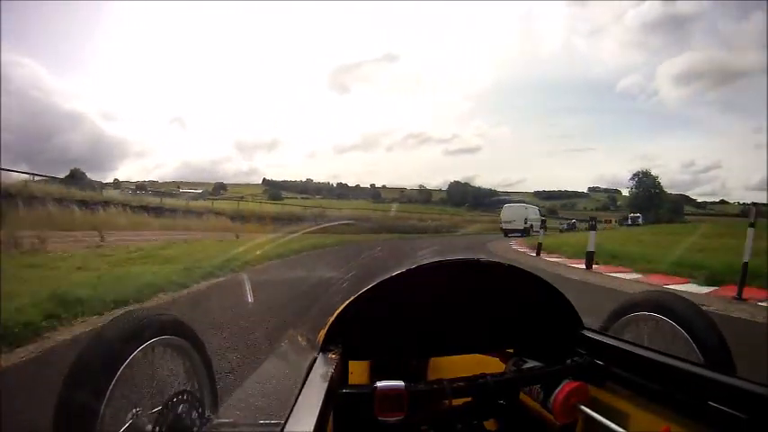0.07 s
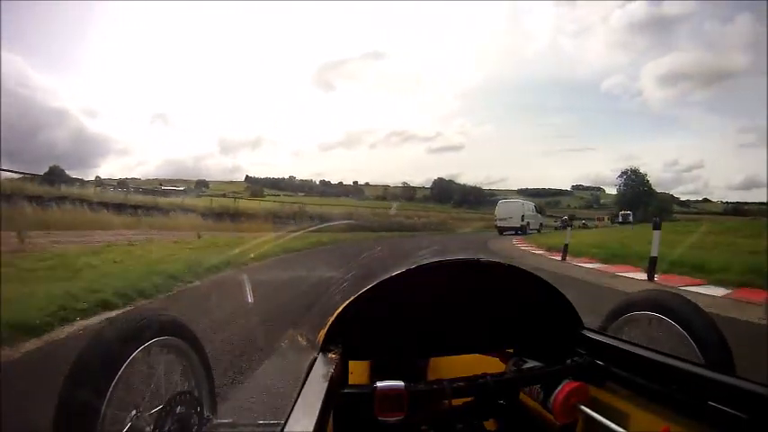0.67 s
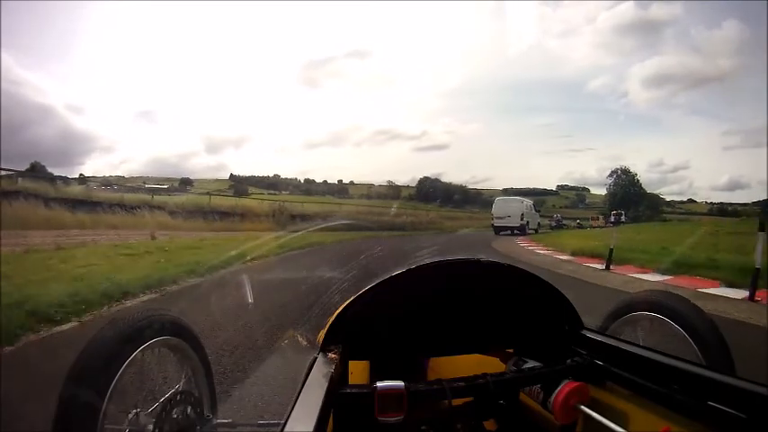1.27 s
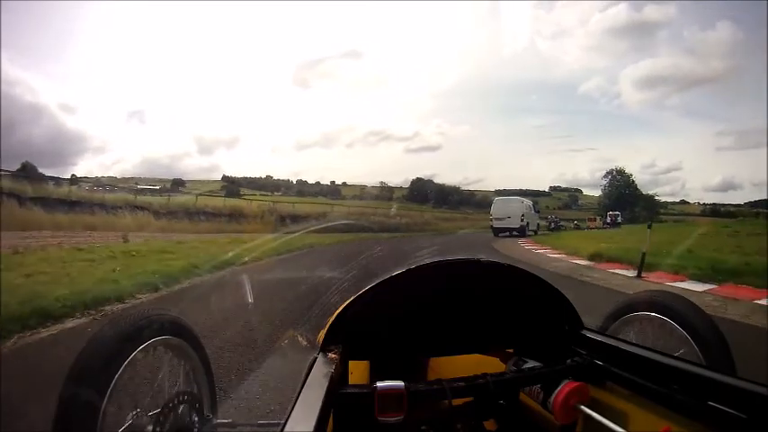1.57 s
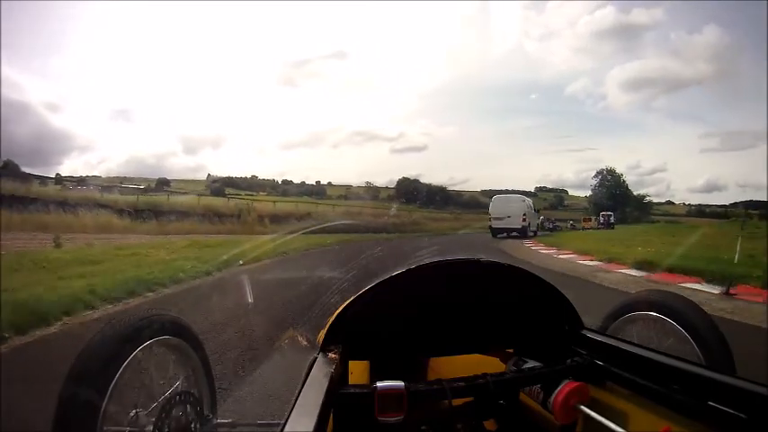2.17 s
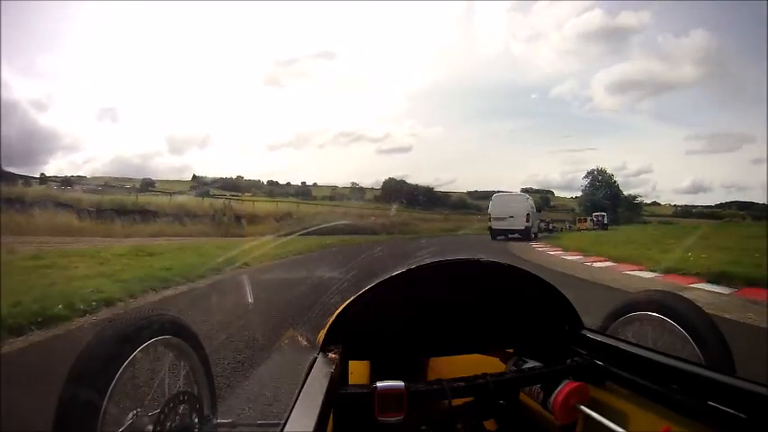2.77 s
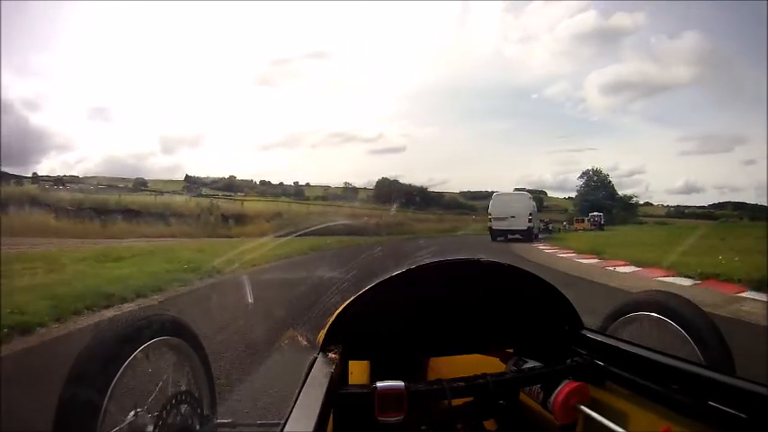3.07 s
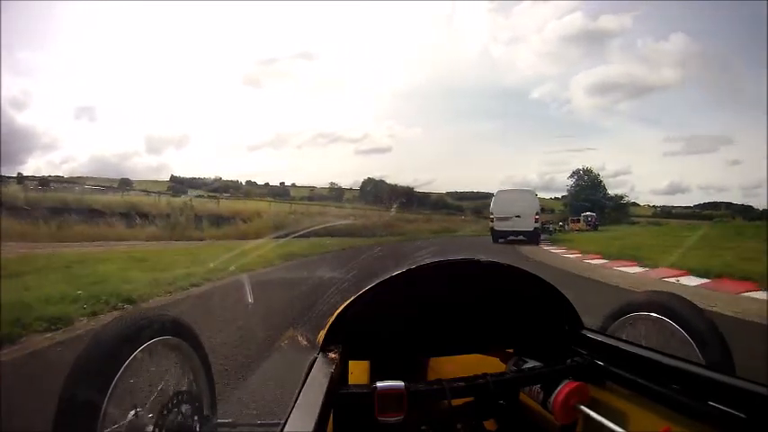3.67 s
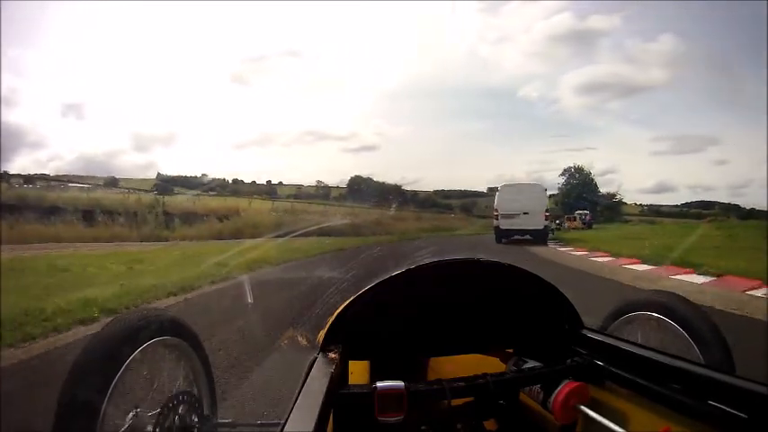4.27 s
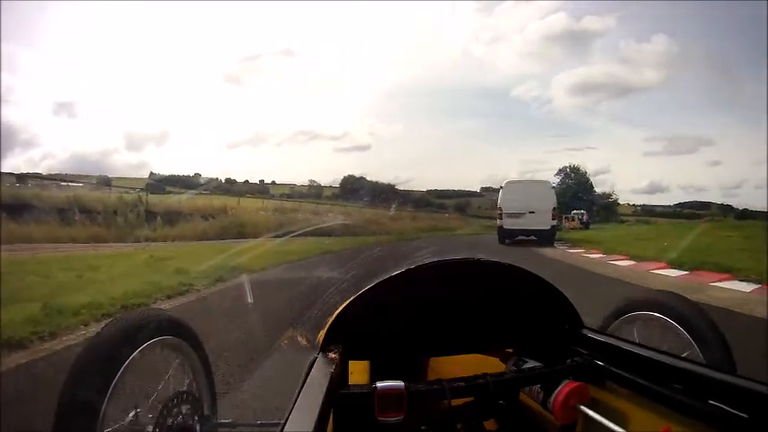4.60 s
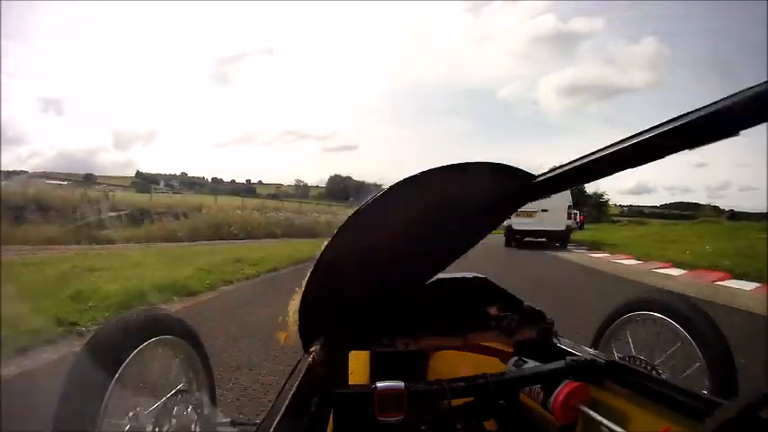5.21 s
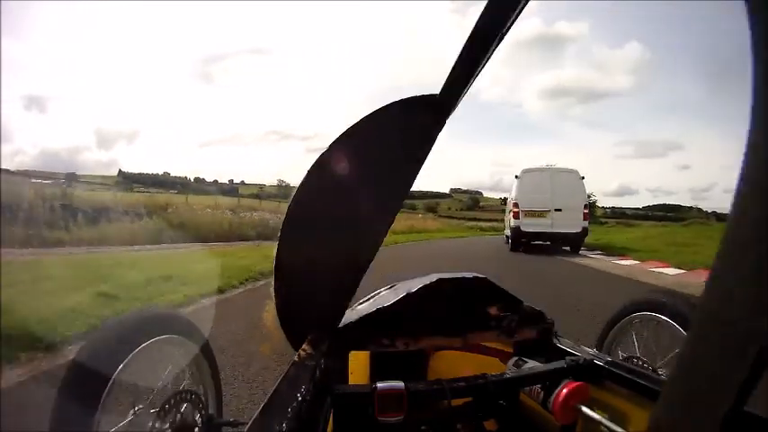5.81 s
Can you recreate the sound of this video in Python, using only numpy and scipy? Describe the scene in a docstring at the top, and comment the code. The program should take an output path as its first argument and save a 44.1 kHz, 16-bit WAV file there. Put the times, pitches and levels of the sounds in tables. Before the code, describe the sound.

A coasting cart drones and rumbles over bumps with light rattling, then its hood scrapes, snaps free and clacks open.

```python
"""A soapbox cart coasts along a paved track, heard from a closed camera case fixed to its body.
From the start the road shakes the frame into a low drone and the shell into a hollow rumble.
Bumps thump through this bed, the fittings chatter and the steering ticks. From 4.6 s the hood
scrapes over its catch; just before 5 s it snaps free with a buzz of the spring, then creaks
and clacks as it swings open."""
import sys
import numpy as np
from scipy.fft import rfft, irfft, next_fast_len
from scipy.io import wavfile
from scipy.ndimage import uniform_filter1d, map_coordinates

SR = 44100
rng = np.random.default_rng(int(sys.argv[2]) if len(sys.argv) > 2 else 0)


def bounce(signal):
    """Save signal as a 16-bit WAV file at the path given by the first command-line argument."""
    frames = np.transpose(np.atleast_2d(signal))
    limited = np.clip(frames, -1, 1)
    pcm = np.round(limited * 32767).astype(np.int16)
    wavfile.write(sys.argv[1], SR, pcm)


N = 257984

# drone of the flexing frame: t/s, level/dB
FRAME_DRONE = [(0.0, -24.5), (0.47, -19.5), (0.54, -35), (0.85, -22), (1.06, -29), (1.84, -21), (1.95, -28),
               (2.26, -22.5), (2.46, -33.5), (3.22, -22), (3.62, -33.5), (3.66, -21), (4.32, -33.5),
               (4.48, -20), (4.97, -31), (5.08, -19.5), (5.3, -43), (5.46, -20.5), (5.52, -48),
               (5.67, -21.5)]
# EQ of the cart heaving on its tyres: f/Hz, level/dB
HEAVE_EQ = [(8, -6.5), (20, 4.5), (29, -4), (45, 2.5), (56, 2), (90, -7), (500, -120)]
# roughness of the asphalt, as shell rumble: t/s, level/dB
ROAD_RUMBLE = [(0, -28.5), (0.75, -24), (0.95, -26.5), (1.6, -23.5), (2.65, -27), (3.3, -27), (3.82, -30),
               (4.0, -23), (4.4, -28), (5.85, -26)]
# bumps in the road: t/s, level/dB, length of the broken patch/s, rattle level/dB
ROAD_BUMPS = [(0.481, -14.5, 0.012, -45.5), (0.679, -22, 0.048, -64.5), (0.735, -22, 0.042, -61),
              (1.13, -15, 0.013, -48), (1.357, -14.5, 0.011, -49.5), (1.482, -15, 0.0098, -53),
              (1.535, -21, 0.024, -57.5), (1.788, -19.5, 0.011, -54), (2.114, -20, 0.015, -56),
              (2.516, -23, 0.015, -64.5), (2.795, -18, 0.03, -55), (2.862, -21.5, 0.019, -61.5),
              (2.917, -24.5, 0.012, -60.5), (3.022, -17.5, 0.045, -62.5), (3.378, -22, 0.017, -61.5),
              (3.466, -16, 0.022, -53), (3.556, -21.5, 0.0072, -56), (4.038, -19.5, 0.036, -58.5),
              (4.143, -20.5, 0.012, -52.5), (4.186, -22.5, 0.013, -55.5), (4.492, -19, 0.012, -46),
              (5.073, -18.5, 0.028, -52.5), (5.382, -26.5, 0.022, -63), (5.756, -17, 0.011, -59)]
# resonances of the body shell: f/Hz, width/Hz, level/dB
SHELL_MODES = [(107, 18, -12), (143, 26, -11.5), (183.7, 16, -8.5), (223.3, 30.5, -5), (259.4, 18, 1),
               (290.8, 16.67, 2.5), (318.9, 23.1, -2.07), (390.6, 38, -12), (539.5, 56.8, -18)]
# cushioning of the tyres: f/Hz, level/dB
TYRE_EQ = [(40, -22.5), (90, 9), (330, -0.5), (560, -10), (750, -9), (1200, -48), (5000, -100)]
# a hard jolt squashes the tyre and passes more upper ring: f/Hz, level/dB
JOLT_EQ = [(110, -5.5), (330, 0.5), (700, 0)]
# colour of the closed case: f/Hz, level/dB
CASE_EQ = [(300, -15), (600, 9.5), (3300, -6.5), (4600, -11), (6000, -21), (8000, -37), (15000, -41)]
# soft mounts that dull the rattling: f/Hz, level/dB
MOUNT_EQ = [(3100, 1), (4400, -2.5), (5200, -13), (8000, -16)]
# resonances of the fittings: f/Hz, width/Hz, level/dB
FITTING_MODES = [(720, 830, -1), (1500, 1100, -11), (2113, 65, 11), (2253, 55, 10.5), (2520, 120, 0.5),
                 (3160, 260, -6), (4330, 760, -9.5)]
# rattling between the bumps: t/s, level/dB
RATTLE_BURSTS = [(0.144, -63), (0.535, -60.5), (1.205, -61), (1.258, -63), (2.828, -59.5), (3.43, -60),
                 (3.485, -60), (4.086, -63.5)]
# clearest jingles of a loose metal part: t/s, level/dB
JINGLE_ACCENTS = [(0.098, -62.5), (0.63, -64.5), (3.437, -63.5)]
# light ticks of the steering: t/s, level/dB
STEERING_TICKS = [(0.887, -34.5), (1.725, -38.5), (2.327, -45.5), (3.363, -50), (3.411, -42.5), (3.82, -49),
                  (3.866, -41.5), (4.341, -45), (4.547, -49)]
# resonances of the steering linkage: f/Hz, width/Hz, level/dB
LINKAGE_MODES = [(970, 2700, 6), (1540, 270, 7.4), (2180, 330, 18), (2850, 490, 15)]
# creaks of the hood's hinge: t/s, level/dB
HINGE_CREAKS = [(1.684, -55.5), (5.114, -51.5), (5.14, -47.5), (5.171, -53), (5.385, -60.5)]
# resonances of the hinge: f/Hz, level/dB
HINGE_MODES = [(2200, 3.5), (3400, -3), (4250, -10), (5700, -14)]
# resonances of the catch's spring: f/Hz, level/dB, t60/s
SPRING_MODES = [(2634, -35, 0.13), (3295, -30, 0.059), (4230, -61, 0.16)]
# shoves that work the hood over its catch: t/s of the peak, level/dB, swell/(dB/s)
HOOD_SHOVES = [(4.79, -33, 198), (4.889, -20.5, 259)]
# the hood's edge sticks and slips on the catch: t/s, level/dB
EDGE_SLIPS = [(4.645, -36), (4.694, -37.5), (4.726, -33), (4.761, -27.5), (4.784, -29), (4.815, -32),
              (4.848, -34.5), (4.992, -32), (5.04, -31.5)]
# EQ of the rubbing: f/Hz, level/dB
SCRAPE_EQ = [(200, -4.5), (350, 16.5), (560, 0.5), (800, -12.5), (1850, -17), (2200, -8.5), (2600, -22),
             (3200, -13.5), (3700, -27.5), (4500, -31), (7500, -46), (15500, -72.5)]
# EQ of the edge's ring: f/Hz, level/dB
EDGE_EQ = [(1200, -19), (2000, 3), (2400, -0.5), (4000, -17.0)]
# EQ of the grinding on the catch's crest: f/Hz, level/dB
GRIND_EQ = [(330, 2.5), (800, -10.5), (1400, -1), (1800, -6), (2300, 5), (3200, -7), (3600, -13.5),
            (4400, -20), (6200, -20), (7600, -38.5), (9000, -36), (15000, -62.5)]
# resonances of the catch: f/Hz, width/Hz, level/dB
CATCH_MODES = [(553, 87, 3), (947, 60, -3), (1380, 440, -10.5), (1707, 88, -4.5), (2230, 115, 4.5),
               (2720, 94, -1), (3010, 220, -1.5), (3360, 110, -8.5), (5300, 2500, -18)]
# hood knocks: t/s, clank level/dB, thud over clank/dB, centre f/Hz, spread/octaves, judder t60/s
HOOD_KNOCKS = [(4.941, -13.5, 4.5, 3110, 0.5, 0.029), (4.956, -23.5, 9.5, 3270, 0.46, 0.042),
               (5.011, -27.5, 8.5, 2230, 0.73, 0.043), (5.026, -27, 7.5, 4200, 3, 0.06),
               (5.205, -37, 2, 2200, 1, 0.22), (5.236, -32, 12.5, 1500, 1.25, 0.098),
               (5.278, -26.5, 0, 1600, 0.36, 0.11), (5.591, -19, -5, 2900, 0.3, 0.035),
               (5.593, -21, 7.5, 835, 0.99, 0.059), (5.614, -23, 7.5, 2400, 0.84, 0.041),
               (5.627, -34.5, -5, 2290, 0.68, 0.076), (5.706, -34, 16.5, 2520, 1.7, 0.042),
               (5.719, -24.5, -12, 2100, 1.34, 0.039)]

FRAME_HZ, FRAME_DRIFT_HZ, FRAME_FLUTTER_DB, HEAVE_DB = 68.28, 4.076, 2.5, -26
UNEVEN_DB, UNEVEN_PER_S = 1.5, 24  # small patches in the asphalt
SURGE_ATTACK_S, BUMP_T60_S = 0.0047, 0.099
THUMP_DB, SCRAPE_SHELL_DB = 3, 4  # wheel's first blow over the bump; shell rumble over the scrape
CHATTER_DB, CHATTER_FOLLOWS = -63.5, 0.7  # on average asphalt; dB per dB of roughness
RATTLE_HOLD_S, RATTLE_STOP_S = 0.025, 0.015  # the clatter stops quickly...
RATTLE_TAIL_DB, RATTLE_T60_S = -19.5, 0.13  # ...but a faint tail lingers
PART_FLICKER_DB, PART_FLICKER_PER_S = 3, 22
JINGLE_HZ, JINGLE_WIDTH_HZ, JINGLE_FLICKER_DB = 3100, 150, 4
JINGLE_DB = -19  # relative to the shaking
CREAK_SWELL_S, HINGE_WIDTH_HZ = 0.0092, 320
SPRING_RELEASE_S, SPRING_WIDTH_HZ = 4.956, 45
PUSH_S, EASE_DB_PER_S = 4.644, 111.5  # the scrape starts; its fall after each shove
CLEAR_S, CLEAR_T60_S = 4.935, 0.078  # the hood slides clear
DRAG_DB, DRAG_END_S, DRAG_T60_S = -47, 5.05, 0.37  # light rubbing under the shoves
SLIP_HOLD_S, SLIP_T60_S = .009, .05
EDGE_PRESSED_HZ, EDGE_FREE_HZ, EDGE_WIDTH_HZ = 2250, 2050, 70
EDGE_DB = -10.5  # ring relative to the rubbing
CREST_S, CREST_DB, CREST_RISE_DB_PER_S, CREST_FALL_DB_PER_S = 4.896, -27, 336, 644.5
HISS_DB, TOP_HZ = -78, 15740


def amp(db):
    """Decibels to gain."""
    return 10 ** (np.asarray(db) / 20)


def unit(x):
    """Scale to rms 1."""
    return x / np.sqrt(np.mean(np.abs(x) ** 2) + 1e-20)


def curve(rows):
    """An automation curve, one value per sample, from (t/s, value) rows."""
    return np.interp(np.arange(N) / SR, *np.transpose(rows))


def wobble(rate):
    """Smooth random modulation, rate knots a second."""
    return map_coordinates(rng.standard_normal(int(N * rate / SR) + 4), [np.arange(N) * rate / SR])


def filtered(x, response):
    """x times a complex response of frequency."""
    size = next_fast_len(len(x) + 8192)
    return irfft(rfft(x, size) * response(np.fft.rfftfreq(size, 1 / SR)), size)[:len(x)]


def eq(x, points):
    """x shaped by (f/Hz, level/dB) points on a log axis."""
    f, db = np.transpose(points)
    return filtered(x, lambda hz: amp(np.interp(np.log(hz + 1), np.log(f), db)))


def resonate(x, modes):
    """x through (f/Hz, width/Hz, level/dB) resonators of alternating polarity."""
    return filtered(x, lambda f: sum(
        (-1) ** k * amp(db) * 1j * f * width / (hz * hz - f * f + 1j * f * width)
        for k, (hz, width, db) in enumerate(modes)))


def band(x, hz, width):
    """x twice through one resonator, for steeper skirts."""
    mode = [(hz, width, 0)]
    return resonate(resonate(x, mode), mode)


def steady(x, span):
    """x with its swells slower than span seconds evened out, rms 1."""
    power = np.abs(uniform_filter1d(x * x, max(int(span * SR), 2)))
    return unit(x / np.sqrt(power + 1e-12))


def grit(rate, spread_db):
    """Tiny impacts at random times and of random sizes, rms 1."""
    chance, size, sign = rng.random(N), rng.standard_normal(N), rng.choice([-1, 1], N)
    return unit((chance < rate / SR) * sign * amp(spread_db * size))


def add(track, s, sound):
    """Mix a sound into the track at s seconds."""
    part = track[round(s * SR):][:len(sound)]
    part += sound[:len(part)]


def surge(hold, t60):
    """An envelope with a quick attack that holds until hold seconds, then decays."""
    t = np.arange(SR // 2) / SR
    return (1 - np.exp(-t / SURGE_ATTACK_S)) * amp(-60 * np.maximum(t - hold, 0) / t60)


def hiss():
    """The microphone's faint white noise floor."""
    return amp(HISS_DB) * rng.standard_normal(N)


def chassis():
    """The frame drones at its bending mode, jolted off pitch by the road; the cart heaves on its tyres."""
    bending_hz = FRAME_HZ + FRAME_DRIFT_HZ * wobble(16)
    tone = np.sin(2 * np.pi * np.cumsum(bending_hz) / SR)
    drone = unit(tone * amp(FRAME_FLUTTER_DB * wobble(22)))
    heave = steady(eq(rng.standard_normal(N), HEAVE_EQ), span=0.067)
    return amp(curve(FRAME_DRONE)) * drone + amp(HEAVE_DB) * heave


def thumps(blows, contact_s):
    """Soft blows (t/s, level/dB) ring the shell."""
    t, out = np.arange(SR // 4) / SR, np.zeros(N)
    force = (t / contact_s) ** 2 * np.exp(-2 * t / contact_s)
    ring = resonate(force, SHELL_MODES)
    for s, db in blows:
        add(out, s, amp(db) * ring / np.abs(ring).max())
    return out


def shell(road_db, friction):
    """Road stones drum on the shell through the tyres; bumps and the scraping hood shake it harder."""
    jolt_power = (amp(SCRAPE_SHELL_DB) * friction) ** 2
    for s, db, length, _ in ROAD_BUMPS:
        add(jolt_power, s, (amp(db) * surge(length, BUMP_T60_S)) ** 2)
    drumming = lambda: eq(resonate(grit(rate=980, spread_db=4), SHELL_MODES), TYRE_EQ)
    rumble = amp(road_db) * steady(drumming(), span=.05)
    jolts = np.sqrt(jolt_power) * steady(eq(drumming(), JOLT_EQ), span=0.027)
    wheel_blows = [(s, db + THUMP_DB) for s, db, *_ in ROAD_BUMPS]
    return rumble + jolts + thumps(wheel_blows, contact_s=0.00037)


def shaking(road_db):
    """Envelope for the loose parts: it rides the road's roughness and surges with each bump or burst."""
    shake = amp(CHATTER_DB + CHATTER_FOLLOWS * (road_db - np.mean(road_db)))
    bumps = [(s, db, length) for s, _, length, db in ROAD_BUMPS]
    bursts = [(s, db, RATTLE_HOLD_S) for s, db in RATTLE_BURSTS]
    for s, db, hold in bumps + bursts:
        tail = amp(RATTLE_TAIL_DB) * surge(hold, RATTLE_T60_S)
        add(shake, s, amp(db) * (surge(hold, RATTLE_STOP_S) + tail))
    return shake


def fittings(shake):
    """Loose fittings chatter against the body, each in its own fits."""
    parts = np.zeros(N)
    for mode in FITTING_MODES:
        chatter = resonate(grit(rate=1100, spread_db=3), [mode])
        parts += chatter * amp(PART_FLICKER_DB * wobble(PART_FLICKER_PER_S))
    clumps = amp(2.2 * wobble(120))
    return shake * clumps * steady(eq(eq(parts, CASE_EQ), MOUNT_EQ), span=0.045)


def jingle(shake):
    """A loose metal part rings in short fits as the cart shakes."""
    fits = amp(JINGLE_DB + JINGLE_FLICKER_DB * np.tanh(wobble(30))) * shake
    for s, db in JINGLE_ACCENTS:
        add(fits, s, amp(db) * surge(hold=.015, t60=RATTLE_STOP_S))
    return fits * steady(band(rng.standard_normal(N), JINGLE_HZ, JINGLE_WIDTH_HZ), span=0.028)


def steering():
    """Play in the linkage gives short dry ticks."""
    t, out = np.arange(SR // 10) / SR, np.zeros(N)
    envelope = (1 - np.exp(-t / 0.00076)) * amp(-60 * t / 0.038)
    for s, db in STEERING_TICKS:
        tick = resonate(envelope * rng.standard_normal(len(t)), LINKAGE_MODES)
        add(out, s, amp(db) * tick / np.abs(tick).max())
    return eq(eq(out, CASE_EQ), MOUNT_EQ)


def hinge():
    """The hood's hinge creaks: brief soft runs of tiny slips ring its modes."""
    t, out = np.arange(SR // 8) / SR, np.zeros(N)
    swell = (t / CREAK_SWELL_S * np.exp(1 - t / CREAK_SWELL_S)) ** 2
    for s, db in HINGE_CREAKS:
        slips = grit(rate=800, spread_db=2.5)[:len(t)]
        ring = sum(amp(mode_db) * band(slips, hz, HINGE_WIDTH_HZ) for hz, mode_db in HINGE_MODES)
        add(out, s, amp(db) * swell * steady(eq(ring, MOUNT_EQ), span=2 * CREAK_SWELL_S))
    return out


def catch_spring():
    """The freed spring buzzes roughly against its seat."""
    t, out = np.arange(SR // 8) / SR, np.zeros(N)
    attack = 1 - np.exp(-t / .002)
    for hz, db, t60 in SPRING_MODES:
        buzz = steady(band(rng.standard_normal(len(t)), hz, SPRING_WIDTH_HZ), span=.012)
        add(out, SPRING_RELEASE_S, amp(db - 60 * t / t60) * attack * buzz)
    return out


def hood_friction():
    """Envelope of the rubbing: it stutters up with each shove, drops as the hood clears, trails off."""
    t = np.arange(N) / SR
    push = sum(amp(db - np.maximum(swell * (s - t), EASE_DB_PER_S * (t - s)))
               for s, db, swell in HOOD_SHOVES)
    push *= amp(-60 * np.maximum(t - CLEAR_S, 0) / CLEAR_T60_S)
    drag = amp(DRAG_DB - 60 * np.maximum(t - DRAG_END_S, 0) / DRAG_T60_S)
    fade_in = np.clip((t - PUSH_S) / 0.0062, 0, 1)
    power = fade_in * (push ** 2 + drag ** 2)
    for s, db in EDGE_SLIPS:
        add(power, s, (amp(db) * surge(SLIP_HOLD_S, SLIP_T60_S)) ** 2)
    return np.sqrt(power)


def edge_ring(hz):
    """Tiny slips keep the hood's edge ringing at one pitch."""
    ring = resonate(grit(rate=1300, spread_db=-0.5), [(hz, EDGE_WIDTH_HZ, 0)])
    return steady(eq(ring, EDGE_EQ), span=0.026)


def hood_scrape(friction):
    """The hood's edge rubs over its catch; on the crest it grinds harshly and its ring drops in pitch."""
    past_crest_s = np.arange(N) / SR - CREST_S
    free = np.clip(.5 + past_crest_s / 0.027, 0, 1)  # crossfade from pressed to free
    ring = np.sqrt(1 - free) * edge_ring(EDGE_PRESSED_HZ) + np.sqrt(free) * edge_ring(EDGE_FREE_HZ)
    rub = steady(eq(grit(rate=2500, spread_db=0.5), SCRAPE_EQ), span=0.023)
    off_crest_db = np.maximum(-CREST_RISE_DB_PER_S * past_crest_s, CREST_FALL_DB_PER_S * past_crest_s)
    grind = steady(eq(grit(rate=2500, spread_db=4.0), GRIND_EQ), span=0.018)
    judder = amp(1.8 * wobble(220))
    return judder * (friction * (rub + amp(EDGE_DB) * ring) + amp(CREST_DB - off_crest_db) * grind)


def hood_knocks():
    """Each knock is a blow and a short judder that ring the catch; its thud goes through the shell."""
    t = (np.arange(SR // 4) - SR // 100) / SR  # 10 ms of pre-roll
    out = np.zeros(N)
    for s, db, _, centre_hz, octaves, t60 in HOOD_KNOCKS:
        blow = 5 * (t == 0)
        judder = (t > 0) * rng.standard_normal(len(t)) * amp(-60 * t / t60)
        # the point of contact decides which modes take the blow
        emphasis = lambda hz: np.exp(-.5 * (np.log2((hz + 1) / centre_hz) / octaves) ** 2) + amp(-20.5)
        clank = eq(filtered(resonate(blow + judder, CATCH_MODES), emphasis), CASE_EQ)
        add(out, s + t[0], amp(db) * clank / np.abs(clank).max())
    thuds = [(s, db + thud_db) for s, db, thud_db, *_ in HOOD_KNOCKS]
    return out + thumps(thuds, contact_s=0.00021)


def scene():
    """A mono mix of faint hiss, the rolling cart and its hood."""
    road_db = curve(ROAD_RUMBLE) + UNEVEN_DB * wobble(UNEVEN_PER_S)
    friction, shake = hood_friction(), shaking(road_db)
    cart = chassis() + shell(road_db, friction) + fittings(shake) + jingle(shake) + steering()
    hood = hood_scrape(friction) + hood_knocks() + catch_spring() + hinge()
    return (hiss() + cart + hood)[None]


def record(dry):
    """A brick-wall low-pass at the camera's band limit."""
    return filtered(dry[0], lambda hz: hz < TOP_HZ)[None]


dry = scene()
out = record(dry)
bounce(out)
```